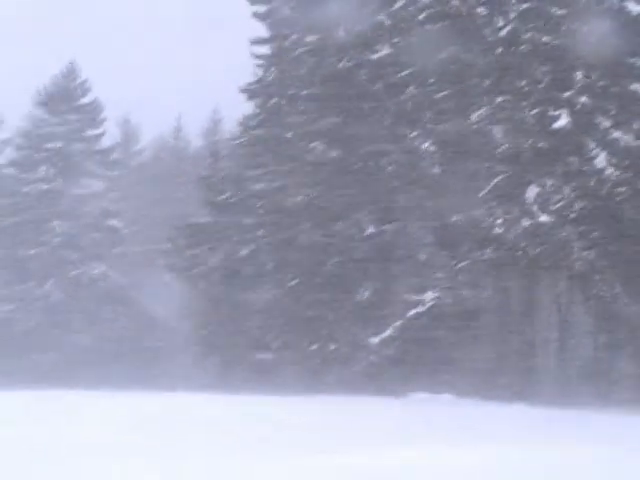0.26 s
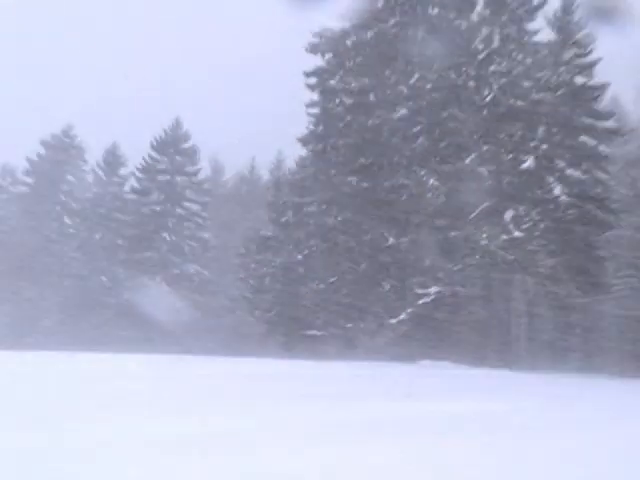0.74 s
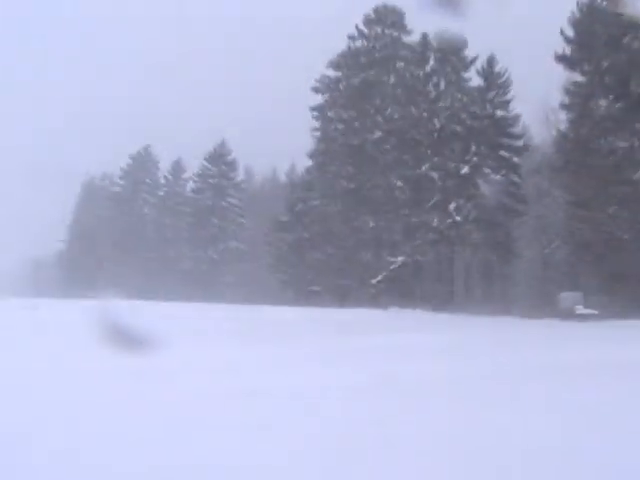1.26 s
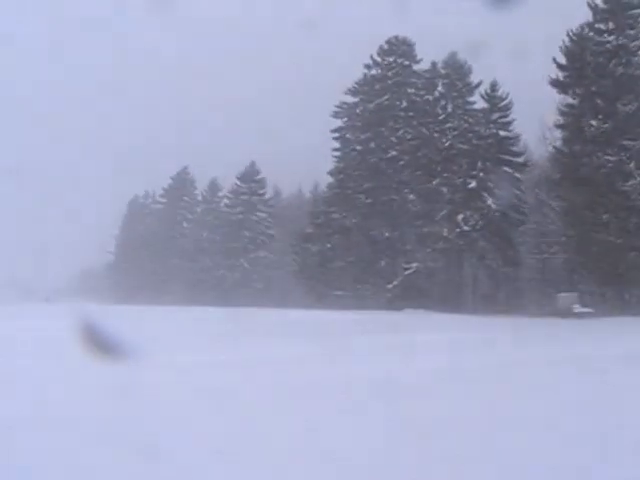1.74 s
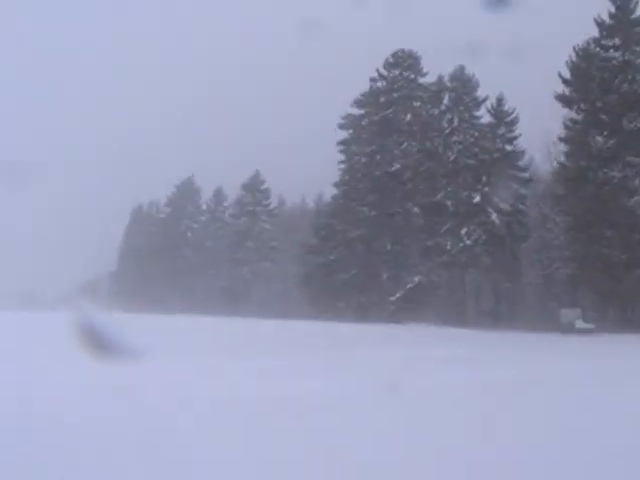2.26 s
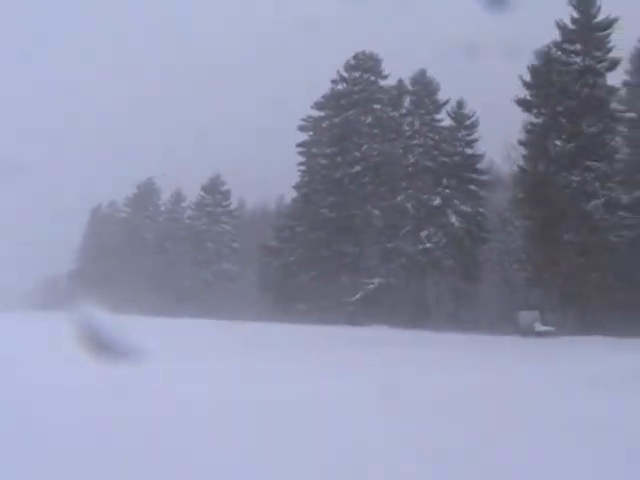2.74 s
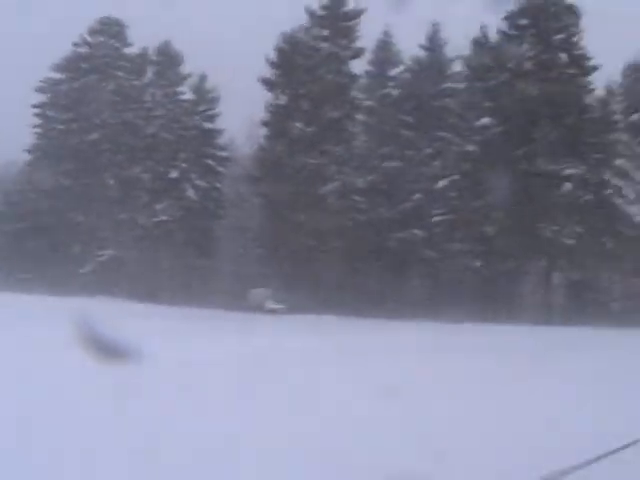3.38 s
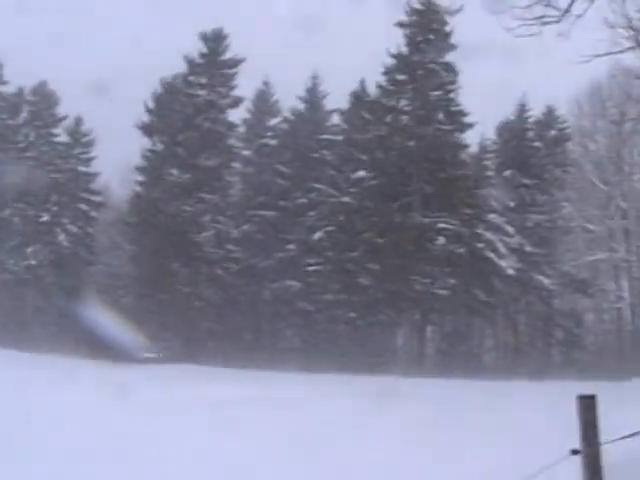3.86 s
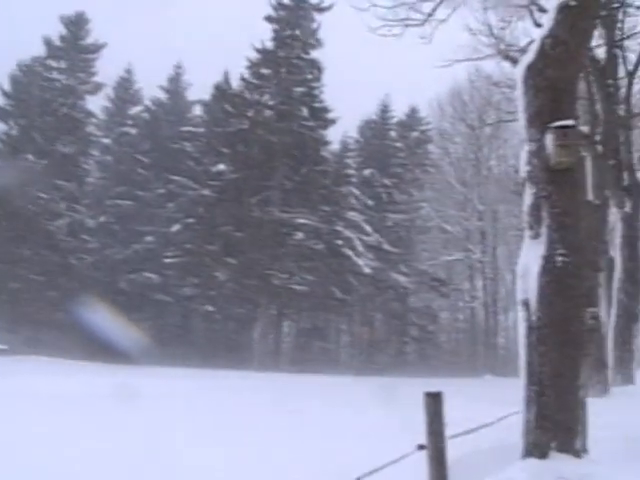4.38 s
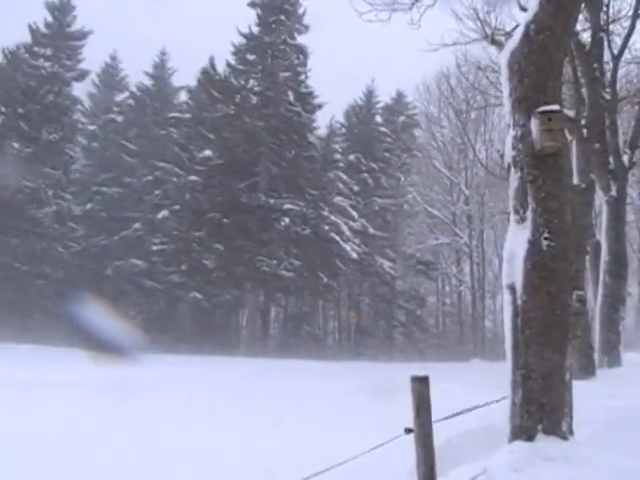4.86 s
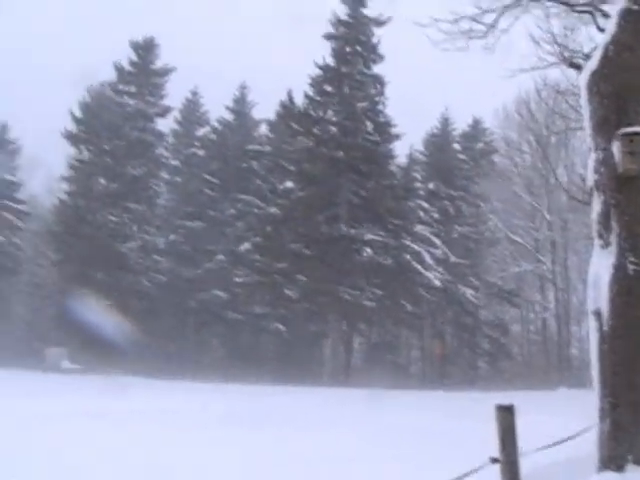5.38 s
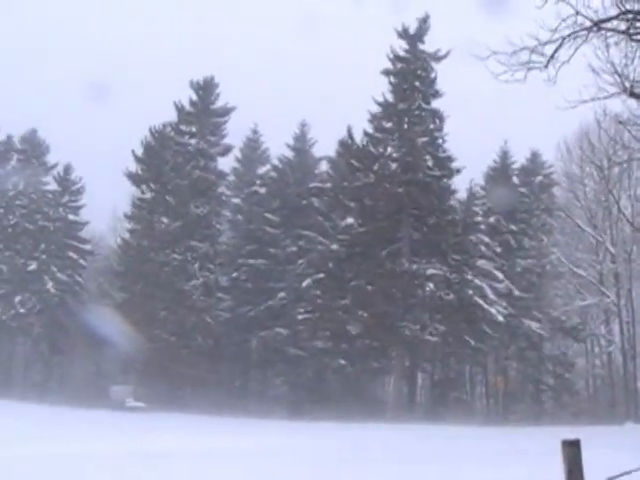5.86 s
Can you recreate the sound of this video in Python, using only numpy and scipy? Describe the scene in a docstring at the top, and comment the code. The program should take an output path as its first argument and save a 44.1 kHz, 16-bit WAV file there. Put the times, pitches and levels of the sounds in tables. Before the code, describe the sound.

Snowstorm wind buffets the microphone in dense, uneven thumps with ticking snow grains, before the spruce wood's hiss rises around one last hard thump.

```python
"""A snowstorm at the edge of a spruce wood, heard through the two close ports of a small stereo microphone.
In the first second turbulent gusts thump and crackle densely, mostly in opposite phase; then they thin out,
while snow grains and flurries, modelled as decaying noise, tick on the housing. Buffeting returns near 3.4 s
and sinks after 4.1 s, as the trees and drifting snow, three bands of noise, swell in a hiss.
A hard thump falls at 5.4 s; weaker ones follow under the loudest hiss."""
import sys
import numpy as np
from scipy import signal
from scipy.fft import rfft, irfft, next_fast_len
from scipy.io import wavfile
from scipy.ndimage import uniform_filter1d

SR = 44100
rng = np.random.default_rng(int(sys.argv[2]) if len(sys.argv) > 2 else 0)


def to_wav(s):
    """Save 16-bit WAV."""
    ch = np.atleast_2d(s).T  # columns
    pcm = np.round(np.clip(ch, -1, 1) * 32767)  # PCM
    wavfile.write(sys.argv[1], SR, pcm.astype(np.int16))


N = 269892
TIME = np.arange(N) / SR

# In all tables levels are relative: the sources add their own gains.
# "Sum" and "difference" are those of the two ports; "edge" is the share of small, bright eddies.

# wind in the trees: time_s, treble_level_db
TREE_WIND = [(0.0, -60), (0.7, -59.5), (0.97, -65), (2.15, -63.5), (3.24, -56), (3.94, -57.5), (5.18, -44),
             (5.54, -43), (6.12, -41)]
# colour of the trees in the sum and in the difference: frequency_hz, density_db (per Hz)
TREES_SUM_COLOUR = [(29, -83), (50, -25), (69, -25), (140, -11), (200, -4.5), (278, -1.5), (380, -5.5),
                    (500, -7), (1000, -9), (3830, -18), (6680, -17.5), (11700, -40), (12800, -46.5),
                    (22000, -120)]
TREES_DIFFERENCE_COLOUR = [(60, -9), (280, -38), (700, -14), (2000, -11), (4800, -16.5), (6500, -11),
                           (8100, -5.5), (9500, -14.5), (12500, -30)]

# short clicks with a knock at the ports, from snow grains or bright-edged eddies:
# time_s, treble_peak_db, body_db (relative to treble)
CLICKS = [(0.4885, -52, 17), (0.632, -44, 19), (1.051, -52, -1), (1.246, -52, 7), (1.2663, -48, 10),
          (1.388, -47.5, 15.5), (1.412, -57, -9), (1.605, -52.5, 17.5), (2.154, -58, 2), (2.304, -54.5, 17),
          (2.718, -54, 19), (2.772, -55, -3), (2.795, -53, 0)]
# flurries of fine snow that pepper the housing: centre_s, spread_s, grain_level_db
FLURRIES = [(1.305, 0.036, -50), (1.86, 0.02, -57), (2.429, 0.058, -52)]
GRAINS_PER_FLURRY = 24
# colour of a click's tick and of its knock: frequency_hz, density_db (per Hz)
TICK_COLOUR = [(1000, -15), (3500, -2), (6500, 5), (9000, -6.5), (12500, -11)]
KNOCK_COLOUR = [(100, -8), (400, 29.5), (1300, -4), (3000, 14), (6000, -25)]

# steady airflow over the ports, which almost dies while the trees swell: time_s, level_db, edge_db
AIRFLOW = [(0, -25, -19), (1.0, -28, -15.5), (1.49, -35.5, -12), (1.76, -31.5, -10.5), (2.23, -32, -16.5),
           (2.5, -28, -19), (2.9, -31, -11), (3.22, -37.5, -44), (3.66, -28.5, -15.5), (4.1, -36, -10),
           (4.22, -55.5, -26), (5.15, -43, -22), (6.12, -39, -22)]
# gusts that ride on it: start_s, length_s, level_db, edge_db
GUSTS = [(0.16, 0.059, -15, -29), (0.484, 0.14, -19, -13), (0.639, 0.059, -20.5, -4),
         (0.81, 0.14, -23.5, -11.5), (0.95, 0.12, -24.5, -10.5), (1.213, 0.14, -31, -6),
         (1.609, 0.081, -28.5, -6), (1.954, 0.14, -23.5, -13), (2.324, 0.024, -26, -6.5),
         (3.014, 0.15, -32.5, -19), (3.276, 0.025, -26.5, -12), (3.376, 0.15, -21, -16.5),
         (3.705, 0.05, -26, -12), (3.781, 0.078, -28.5, -6), (5.38, 0.02, -23, -15),
         (5.653, 0.18, -30.5, -27), (5.952, 0.21, -27, -28)]
GUST_ATTACK_S, GUST_RELEASE_S = 0.016, 0.047

# colour of the crackle at the rims of the ports: frequency_hz, density_db (per Hz)
CRACKLE_COLOUR = [(200, -29), (700, -6), (1300, 6), (2200, 2), (3300, -27), (7000, -26), (12000, -42)]
POPS_PER_S = 700
# fast eddies that skim a rim and rasp: centre_s, level_db, length_s, band_centre_hz
RASPS = [(0.457, -36, 0.0027, 1890), (0.49, -33, 0.0019, 4350), (0.637, -29.5, 0.0044, 3000),
         (0.68, -34.5, 0.022, 2130), (0.815, -34.5, 0.0096, 3320), (1.253, -43.5, 0.02, 1900),
         (1.661, -39.5, 0.029, 1920), (2.083, -37.5, 0.0062, 2430), (2.327, -39, 0.0059, 1980),
         (3.395, -32.5, 0.0027, 2600), (3.459, -37, 0.025, 1110), (3.752, -35.5, 0.028, 1030),
         (3.787, -36, .007, 1880), (3.841, -32.5, 0.004, 1370), (3.85, -36.5, 0.062, 845),
         (3.985, -30.5, 0.0073, 1130), (5.371, -24.5, 0.0053, 1200)]
RASP_POPS_PER_S, RASP_WIDTH = 2500, 1.4  # width: ratio of the band's edges to its centre

# compact eddies that slap a port: centre_s, level_db, nominal_pitch_hz, sum_db (relative to difference)
SLAPS = [(0.4895, -1, 560, -9.5), (0.657, 5, 380, -20), (0.724, -6, 220, -6), (0.839, 0, 264, -15),
         (0.967, -6, 276, -11), (1.2683, -14.5, 513, -4.5), (1.39, -16, 620, -4), (1.455, -8, 386, -9),
         (1.937, -10, 298, -4.5), (1.999, -1.5, 324, -15.5), (2.066, 5.5, 214, -14.5),
         (2.551, -7.5, 250, -16), (2.7173, -2.5, 547, -5.5), (3.353, -14, 190, -4), (3.38, 4, 268, -11.5),
         (3.476, -12, 149, -10), (3.707, -2, 260, -26)]

# how evenly the air meets both ports: time_s, sum_db (relative to difference)
EVENNESS = [(0, -13.5), (2.3, -12), (3.5, -11), (4.2, -10.5), (5.45, -11), (6.1, -4.5)]
# colour of the buffeting in the sum and in the difference: frequency_hz, density_db (per Hz)
BUFFET_SUM_COLOUR = [(18, -52), (30, -19), (59, -8.5), (100, 0), (160, 2.5), (359, 2), (560, -2.5),
                     (1100, -12), (2800, -25.5), (4400, -37), (6740, -39.5), (12000, -74), (22000, -120)]
BUFFET_DIFFERENCE_COLOUR = [(18, -92), (30, -60), (80, -3), (161, 6), (387, 3.3), (536, -3.5), (1000, -12),
                            (2540, -34), (5660, -59.5), (8030, -50), (12000, -78), (22000, -120)]
# small eddies sound above EDGE_HZ; the buffeting colours hold for air with the usual edge
EDGE_HZ, USUAL_EDGE_DB = 700, -17.5

# strong eddies that sweep past: nominal_centre_s, level_db, length_s, edge_db, sum_db (relative to difference)
THUMPS = [(0.080, -5.5, 0.01, -17, -12.5), (0.103, -9.5, 0.0049, -15, -9.5),
          (0.139, -13.5, 0.0055, -13, -14.5), (0.166, -8.5, 0.01, -9, -10.5),
          (0.183, -10.5, 0.0045, -24, -11), (0.231, -9.5, .007, -16, -15.5),
          (0.263, -15.5, 0.003, -17, -10), (0.32, -17, 0.009, -17, -9.5), (0.355, -15, 0.0056, -17, -13),
          (0.385, -11, 0.0034, -26, -11), (0.458, -5.5, 0.006, -16.5, -11), (0.487, -6.5, 0.011, -10, -11),
          (0.516, -13.5, 0.0088, -6, -12), (0.557, -6.5, 0.011, -9, -12), (0.593, -14.5, 0.0095, -1, -9.5),
          (0.635, -6, 0.002, -7, -10), (0.641, -5.5, 0.0085, -18, -10.5), (0.687, -20.5, 0.012, 15, -6.5),
          (0.704, -17, 0.0046, -34, -2.5), (0.799, -17, 0.008, -4.5, -6), (0.81, -7, 0.013, -9, -19),
          (0.821, -9, 0.0094, -8, -8.5), (0.861, -9, .0035, -15, -11.5), (0.881, -12, 0.011, -4, -12),
          (0.955, -13, 0.0063, 0, -7.5), (0.99, -15, 0.006, -7, -7), (1.016, -16, 0.0061, -14, -6),
          (1.185, -23, 0.014, -9, -14), (1.249, -20.5, 0.0097, 3, -14.5), (1.552, -24.5, .008, -5, -10.5),
          (1.62, -17.5, 0.015, -25, -13), (1.646, -21.5, .009, -12, -7.5), (1.668, -18, 0.011, -10, -12),
          (1.703, -25.5, 0.0074, 10, -9), (1.757, -20, 0.0095, -22, -15.5), (1.808, -20, 0.0095, -8, -13.5),
          (1.939, -12, 0.0055, -7.5, -13.5), (2.057, -20.5, 0.0043, -23, -7),
          (2.083, -14, 0.018, -6, -11.5), (2.324, -22, 0.0053, 14, -10), (2.345, -15.5, 0.0051, -12, -15.5),
          (2.428, -24.5, 0.0091, -6, -15), (2.686, -23, 0.013, -7, -12), (2.719, -15, 0.013, 3, -12),
          (2.954, -15.5, 0.0041, -27, -15), (3.014, -18, 0.0094, -12, -13.5),
          (3.078, -19.5, 0.016, -17, -11), (3.306, -16.5, 0.012, -17, -14.5),
          (3.397, -8.5, 0.0049, -1, -17), (3.423, -17, 0.011, 7, -11.5), (3.461, -16, 0.0072, -16, -22),
          (3.476, -13.5, 0.017, -26, -12), (3.524, -11, 0.0087, -25, -18.5), (3.644, -17, 0.0052, -7, -15),
          (3.745, -9.5, 0.007, -24, -12.5), (3.782, -6, 0.012, -10, -13.5),
          (3.987, -21.5, 0.029, -3, -13.5), (4.086, -21, 0.0094, -6, -10), (4.109, -20, 0.012, -13, -14),
          (4.9, -20, 0.0075, -23, -7), (5.369, -3, 0.0046, -11, -10.5), (5.378, -4.5, 0.014, -10, -10),
          (5.408, -8, 0.018, -12, -10.5), (5.448, -18.5, .009, -18, -13), (5.668, -19.5, 0.0088, -35, -11),
          (5.737, -18, 0.019, -19, -15.5), (5.813, -15.5, 0.0076, -22, -12),
          (5.85, -16.5, 0.015, -33, -11.5), (5.951, -19.5, 0.011, -32, -9), (5.974, -22, 0.0079, -13, -11),
          (6.02, -19, 0.012, -26, -6), (6.06, -19.5, 0.011, -18, -5.5), (6.108, -15.5, 0.013, -20, -9.5)]
# weaker eddies come at random; their base level is relative to the wind that carries them
EDDIES_PER_S, EDDY_DB, EDDY_RANGE_DB, EDDY_S, EDDY_EDGE_DB = 7, 2.5, 5, 0.0049, -10

TOP_HZ = 12800


def undb(db):
    """Logarithmic level: decibels to amplitude gain."""
    return 10 ** (np.asarray(db) / 20)


def curves(table):
    """Linear interpolation: the columns of a timed table, joined by straight lines."""
    s, *columns = np.transpose(table)
    return [np.interp(TIME, s, column) for column in columns]


def colour(x, points):
    """Minimum-phase filtering through (Hz, dB) points; white noise keeps its power."""
    size = next_fast_len(x.shape[-1] // 2 + 1) * 2
    hz, db = np.transpose(points)
    bin_hz = np.arange(size // 2 + 1) * SR / size
    gain = undb(np.interp(np.log(bin_hz + 1), np.log(hz), db))
    cepstrum = irfft(np.log(gain / np.sqrt(np.mean(gain ** 2))))
    # folding the cepstrum onto positive time makes the filter causal
    cepstrum[1:size // 2] *= 2
    cepstrum[size // 2 + 1:] = 0
    response = np.exp(rfft(cepstrum))
    return irfft(rfft(x, size) * response)[..., :x.shape[-1]]


def walk(rate):
    """Smoothed random process with about `rate` turns a second and a standard deviation of 1."""
    hold = max(int(SR / rate), 2)
    steps = np.repeat(rng.standard_normal(N // hold + 1), hold)[:N]
    y = uniform_filter1d(steps, hold)
    return y / y.std()


def add(out, sound, s):
    """Superposition: mix a short sound in from time s."""
    start = int(np.clip(s * SR, 0, N - 1))
    out[:, start:start + sound.shape[1]] += sound[:, :N - start]


def centred_time(size):
    """Local time axis in seconds, with zero in the middle of a short sound."""
    return (np.arange(size) - size // 2) / SR


def random_pops(size, per_s, scatter_db):
    """Random impulse process: pops of either sign with log-normal strength, independent in each channel."""
    present = rng.random((2, size)) < per_s / SR
    sign = rng.choice([-1, 1], (2, size))
    return present * sign * undb(scatter_db * rng.standard_normal((2, size)))


def trees(gain_db=9.5, side_db=-13, roar_follow=0.85, spray_follow=1.0, full_db=-44.5, waver_db=0.33):
    """Broadband aerodynamic noise: boughs roar, needles hiss, blown snow sizzles; the roar grows least with wind."""
    force_db = curves(TREE_WIND)[0] - full_db
    mid = colour(rng.standard_normal(N), TREES_SUM_COLOUR)
    side = undb(side_db) * colour(rng.standard_normal(N), TREES_DIFFERENCE_COLOUR)
    air = np.array([mid, side])
    roar = signal.sosfiltfilt(signal.butter(1, 1800, fs=SR, output="sos"), air)
    spray = signal.sosfiltfilt(signal.butter(3, 8500, "high", fs=SR, output="sos"), air)
    hiss = air - roar - spray
    out = np.zeros((2, N))
    for band, growth in [(roar, roar_follow), (hiss, 1), (spray, spray_follow)]:
        out += band * undb(full_db + gain_db + growth * force_db + waver_db * walk(16))
    return out


def wind():
    """Addition of powers: level and edge of gusts that rise, hold and die away on top of the steady flow."""
    flow_db, flow_edge_db = curves(AIRFLOW)
    power = undb(flow_db) ** 2
    edge = power * undb(flow_edge_db)
    for start, length, db, edge_db in GUSTS:
        before = np.maximum(start - TIME, 0) / GUST_ATTACK_S
        after = np.maximum(TIME - start - length, 0) / GUST_RELEASE_S
        gust = undb(db) ** 2 * np.exp(-2 * np.minimum(before + after, 20))
        power = power + gust
        edge = edge + gust * undb(edge_db)
    # the edge is the power-weighted mean of the amplitude ratios
    return 10 * np.log10(power), 20 * np.log10(edge / power)


def clicks_and_snow(wind_db, tick_db=14.5, knock_db=6.0, side_db=6.0, fine_db=-48, count=70, size=1024):
    """Impulsive excitation: clicks tick and knock; fine snow ticks in flurries or at random, harder in a gust."""
    ticks, knocks = np.zeros((2, N)), np.zeros((2, N))
    fade = np.exp(-np.arange(size) / SR / 0.001)
    for s, db, body_db in CLICKS:
        hit = rng.standard_normal((2, size)) * fade
        hit *= 4 / np.linalg.norm(hit, axis=1, keepdims=True)
        add(ticks, hit * undb(db + tick_db), s + 0.00086)
        add(knocks, hit * undb(db + body_db + knock_db), s + 0.00035)
    for when, weight in rng.random((count, 2)):
        lull_db = wind_db[int(when * N)] - wind_db.max()
        db = fine_db + 12 * weight ** 2 + 2.9 * lull_db
        add(ticks, rng.standard_normal((2, size)) * fade * undb(db), when * N / SR)
    for centre, spread, db in FLURRIES:
        for late, weight in rng.standard_normal((GRAINS_PER_FLURRY, 2)):
            hit = rng.standard_normal((2, size)) * fade
            add(ticks, hit * undb(db + 2.7 * weight), centre + spread * late)
    return colour(ticks, TICK_COLOUR) * undb([[0], [-4]]) + colour(knocks, KNOCK_COLOUR) * undb([[0], [side_db]])


def crackle(wind_db, edge_db, gain_db=-15.0, edge_follow=0.74, scatter_db=5.5, side_db=2.0):
    """Flow separation: fast air tears at the rims in dense pops that grow with the wind's strength and edge."""
    pops = random_pops(N, POPS_PER_S, scatter_db)
    strength = undb(wind_db + edge_follow * edge_db + gain_db)
    return colour(pops / pops.std() * strength, CRACKLE_COLOUR) * undb([[0], [side_db]])


def rasps(gain_db=0.0, side_db=2.5, scatter_db=5.0, size=4096):
    """Band-limited impulse noise: volleys of pops at a rim, each in the band its row gives."""
    out = np.zeros((2, N))
    t = centred_time(size)
    for s, db, length, hz in RASPS:
        pops = random_pops(size, RASP_POPS_PER_S, scatter_db)
        band = signal.butter(3, [hz / RASP_WIDTH, hz * RASP_WIDTH], "band", fs=SR, output="sos")
        volley = signal.sosfilt(band, pops * np.exp(-(t / length) ** 2))
        volley *= np.sqrt(length * SR) / np.linalg.norm(volley, axis=1, keepdims=True)
        add(out, volley * undb([[db + gain_db], [db + gain_db + side_db]]), s + t[0])
    return out


def slaps(gain_db=2.5, turns=0.29, sum_ratio=1.14, steepen=0.79, rounding_hz=5000, size=2048):
    """Damped pressure pulse: one quick push and pull, steepest in the middle; the sum is shorter and so higher."""
    out = np.zeros((2, N))
    t = centred_time(size)
    for s, db, hz, sum_db in SLAPS:
        cycles = np.abs(hz * t * np.array([[sum_ratio], [1]])) ** np.array([[steepen], [1]])
        swing = np.sign(t) * np.sin(2 * np.pi * cycles) * np.exp(-cycles / turns)
        swing *= rng.choice([-1, 1], (2, 1))
        add(out, swing * undb([[db + gain_db + sum_db], [db + gain_db]]), s + t[0])
    return signal.sosfilt(signal.butter(4, rounding_hz, fs=SR, output="sos"), out)


def ports(pressure, edge_db, mid_edge=0.89):
    """Turbulent scale: a higher edge adds small, bright eddies; sum and difference of the ports are coloured apart."""
    high_pass = signal.butter(2, EDGE_HZ, "high", fs=SR, output="sos")
    small = signal.sosfiltfilt(high_pass, pressure)
    large = pressure - small
    extra_db = edge_db - USUAL_EDGE_DB
    mid = colour(large[0] + small[0] * undb(mid_edge * extra_db), BUFFET_SUM_COLOUR)
    side = colour(large[1] + small[1] * undb(extra_db), BUFFET_DIFFERENCE_COLOUR)
    return np.array([mid, side])


def buffeting(level_db, edge_db, gain_db=-1.5, surge_db=0.73, flutter_db=3.0, edge_flutter_db=0.95):
    """Turbulent cascade: surges break into quick puffs; the stronger a surge, the brighter."""
    surge, flutter = walk(55), walk(160)
    strength = undb(level_db + gain_db + surge_db * surge + flutter_db * flutter)
    edge_db = edge_db + edge_flutter_db * (surge + walk(90))
    mid, side = ports(rng.standard_normal((2, N)) * strength, edge_db)
    return np.array([mid * undb(curves(EVENNESS)[0]), side])


def stray_eddies(wind_db, sum_db=-10.5):
    """Random arrivals: weaker eddies scaled by the wind, in the columns of THUMPS."""
    eddies = []
    for when, weight, stretch in rng.random((int(EDDIES_PER_S * N / SR), 3)):
        db = wind_db[int(when * N)] + EDDY_DB + EDDY_RANGE_DB * weight ** 2
        eddies.append((when * N / SR, db, EDDY_S * (.5 + stretch), EDDY_EDGE_DB, sum_db))
    return eddies


def thumps(eddies, gain_db=0.0, bright_db=-6.0, rise=0.68, fall=0.81, edge_shape=1.09, spike_db=4.0, size=4096):
    """Convected eddy: a vortex sweeps over the ports as a rough burst, broken into spikes under a millisecond long."""
    out = np.zeros((2, N))
    t = centred_time(size)
    for s, db, length, edge_db, sum_db in eddies:
        reach = length * np.where(t < 0, rise, fall)
        pressure = rng.standard_normal((2, size)) * np.exp(-np.abs(t / reach) ** edge_shape)
        pressure *= undb(spike_db * np.repeat(rng.standard_normal(size // 32), 32))
        eddy = ports(pressure, edge_db + bright_db)
        eddy *= np.sqrt(length * SR) / np.linalg.norm(eddy, axis=1, keepdims=True)
        add(out, eddy * undb([[db + gain_db + sum_db], [db + gain_db]]), s + t[0] - .001)
    return out


def scene():
    """Sum-and-difference stereo: all sources turned into left and right; the trees stand a little to the left."""
    to_stereo = np.array([[1, 1.0], [1, -1.14]])
    lean_db, port_lean_db = 0.83, 0.5
    wind_db, edge_db = wind()
    far = trees()
    near = clicks_and_snow(wind_db) + crackle(wind_db, edge_db) + rasps() + slaps()
    near += buffeting(wind_db, edge_db) + thumps(stray_eddies(wind_db)) + thumps(THUMPS)
    far_stereo = undb([[lean_db], [-lean_db]]) * (to_stereo @ far)
    near_stereo = undb([[port_lean_db], [-port_lean_db]]) * (to_stereo @ near)
    return far_stereo + near_stereo


def follow(x, attack_s, release_s):
    """Peak detection: an envelope that rises fast and lets its peaks fade slowly."""
    keep = np.exp(-1 / (attack_s * SR))
    fast = signal.lfilter([1 - keep], [1, -keep], x) + 1e-9  # keeps the logarithm finite
    fade = TIME / release_s
    return np.exp(np.maximum.accumulate(np.log(fast) + fade) - fade)


def record(dry, wind_cut_hz=45, threshold=0.13, attack_s=0.013, release_s=0.18):
    """Compression and clipping: deep bass is trimmed, gain ducks after hard thumps, peaks clip, the top is cut."""
    x = signal.sosfilt(signal.butter(2, wind_cut_hz, "high", fs=SR, output="sos"), dry)
    envelope = follow(np.abs(x).max(axis=0), attack_s, release_s)
    x = x * np.sqrt(threshold / np.maximum(envelope, threshold))  # ratio 2:1 above the threshold
    low_pass = signal.ellip(8, .2, 70, TOP_HZ, fs=SR, output="sos")
    return signal.sosfilt(low_pass, np.clip(x, -1, 1))


dry = scene()
out = record(dry)
to_wav(out)
```